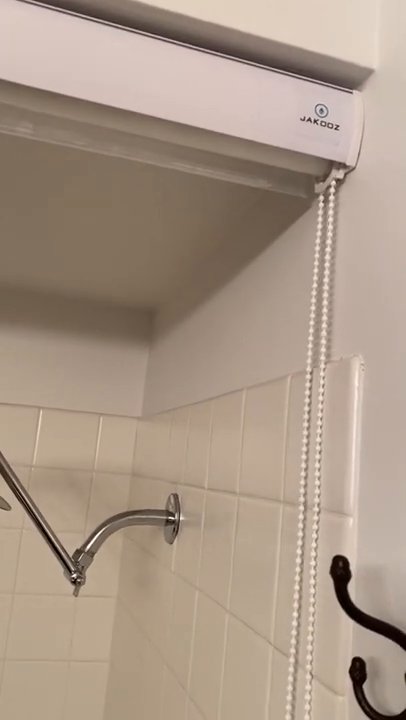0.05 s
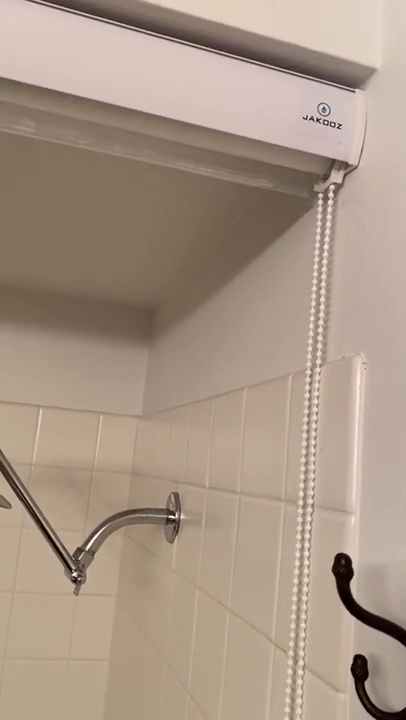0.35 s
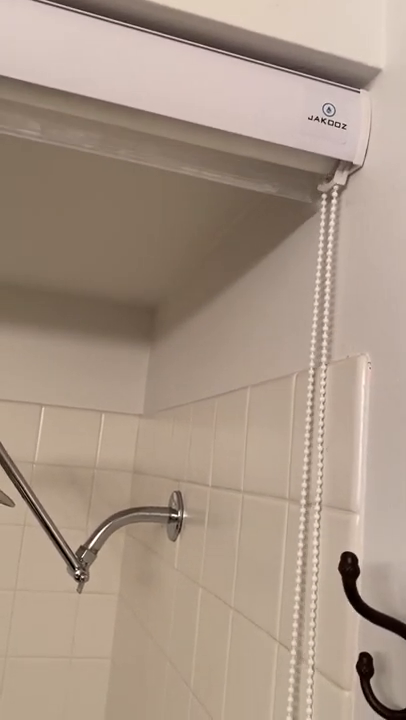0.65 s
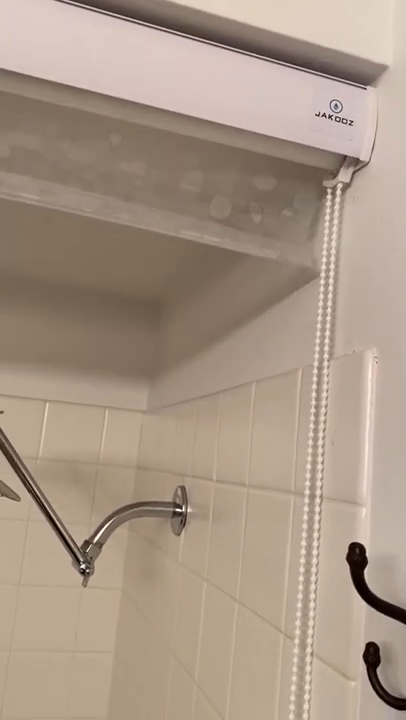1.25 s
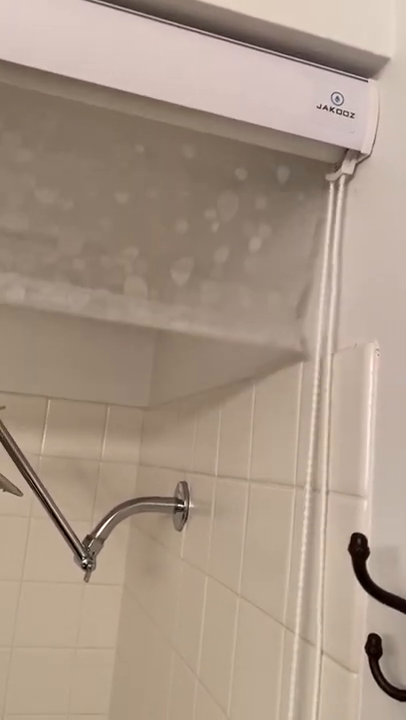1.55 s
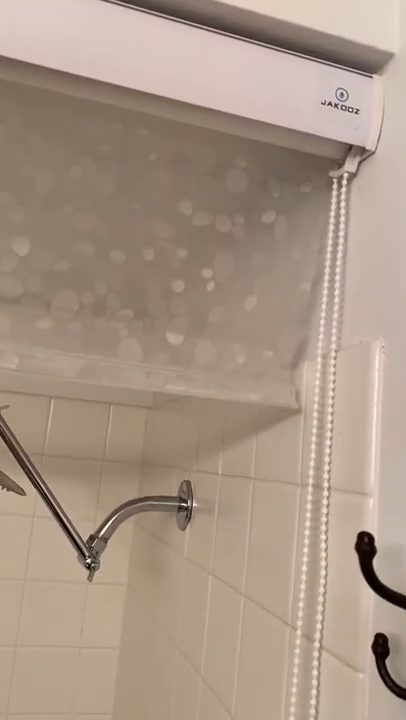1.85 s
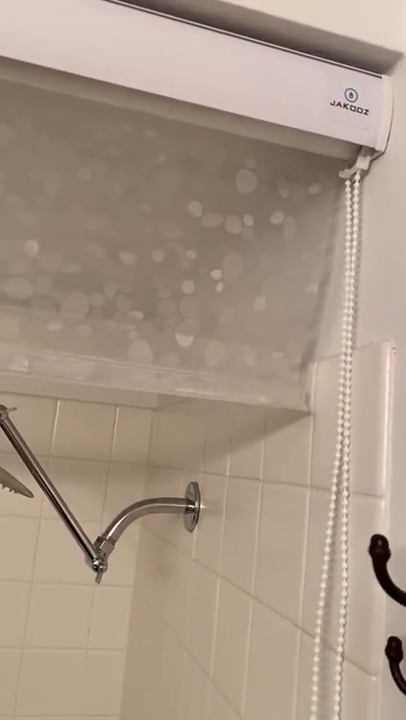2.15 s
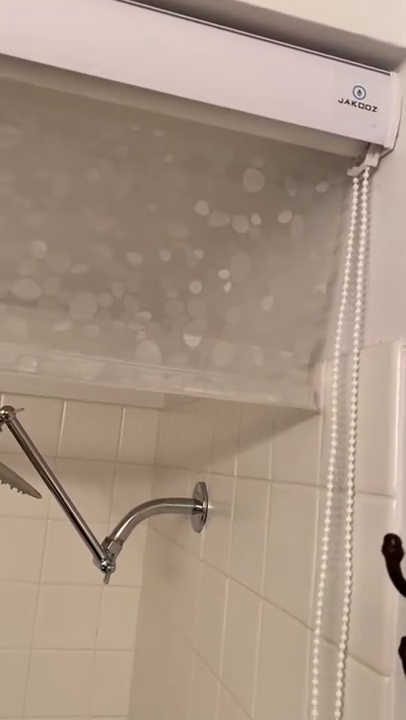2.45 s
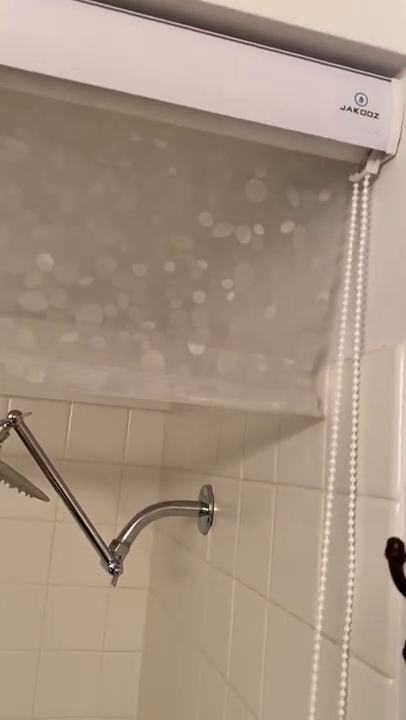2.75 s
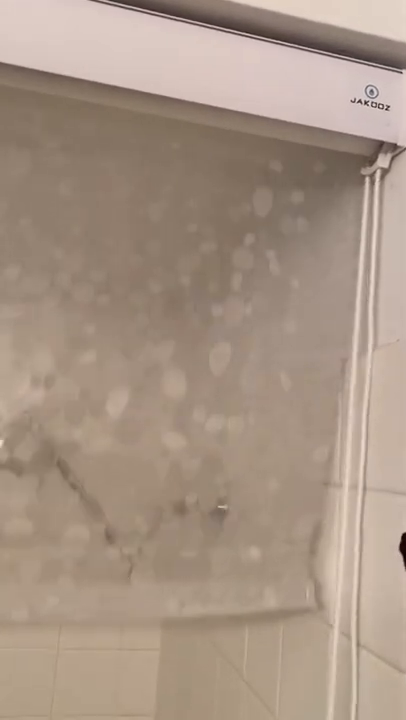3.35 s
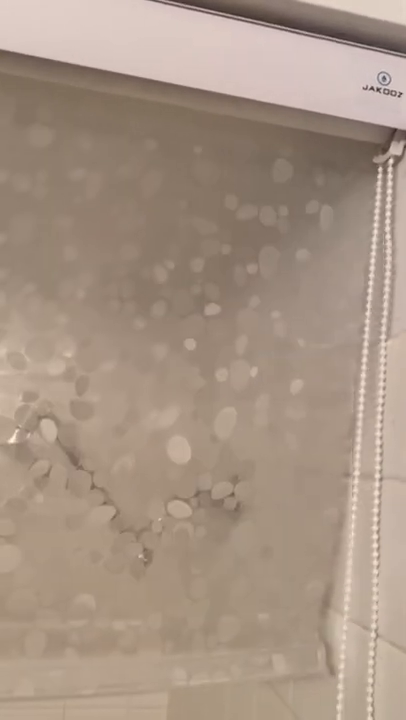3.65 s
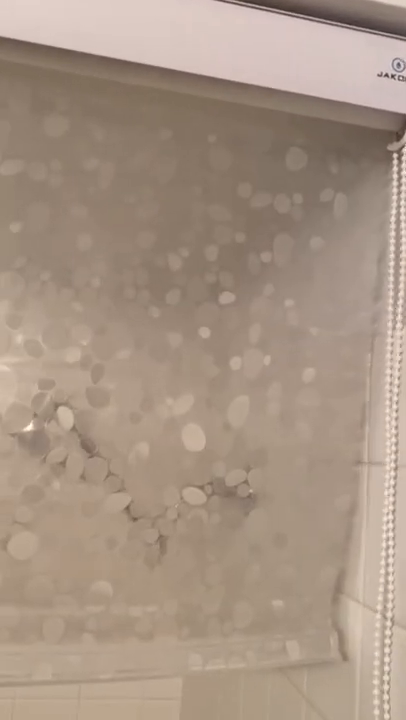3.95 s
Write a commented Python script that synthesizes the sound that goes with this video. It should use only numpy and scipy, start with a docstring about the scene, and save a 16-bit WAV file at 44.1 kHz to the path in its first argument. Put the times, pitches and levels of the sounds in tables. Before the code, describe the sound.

Bead chain clicks and whirs twice as a roller blind unrolls in a tiled bathroom.

```python
"""Roller blind in a tiled bathroom

Two pulls on a bead chain lower the blind: beads tick over the sprocket while clutch and tube whir.
Before each pull the slack chain swishes and knocks on the plastic housing; the first pull ends in a
clack and a thump. The tiles ring after every sound, over a low ventilation rumble."""
import sys
import numpy as np
from scipy import signal
from scipy.fft import rfft, irfft
from scipy.io import wavfile
from scipy.ndimage import uniform_filter1d

SR = 44100
rng = np.random.default_rng(int(sys.argv[2]) if len(sys.argv) > 2 else 0)


def log_audio(samples):
    """Write samples as a 16-bit WAV file to the path given in sys.argv[1]."""
    # one column per channel
    frames = np.atleast_2d(samples).T
    # limit to full scale, then quantise
    limited = np.clip(frames, -1, 1)
    pcm = np.round(limited * 32767).astype(np.int16)
    wavfile.write(sys.argv[1], SR, pcm)


N = 176400
T = np.arange(N) / SR
FILTER_HZ = np.fft.rfftfreq(8192, 1 / SR)


def amp(db):
    """Decibels to gain."""
    return 10 ** (np.asarray(db) / 20)


def unit(x):
    """Scales to rms 1."""
    return x / np.sqrt(np.mean(x ** 2) + 1e-20)


def curve(points, hz=FILTER_HZ):
    """Reads a table on a log-frequency axis."""
    f, value = np.transpose(points)
    return np.interp(np.log(hz + 1), np.log(f + 1), value)


def bins(size):
    """Frequencies of a spectrum."""
    return np.fft.rfftfreq(size, 1 / SR)


def add(mix, start_s, sound):
    """Drops a sound into the mix."""
    part = mix[max(round(start_s * SR), 0):][:len(sound)]
    part += sound[:len(part)]


def ring(db):
    """Minimum-phase impulse response of an EQ curve."""
    log_gain = np.log(amp(np.r_[db, db[-2:0:-1]]))
    return np.fft.ifft(np.exp(np.conj(signal.hilbert(log_gain)))).real[:len(db)]


def grains(per_s, spread_db):
    """Tiny random impacts of uneven size, rms 1."""
    size = amp(spread_db * np.minimum(rng.exponential(1, N), 3))
    return unit(size * rng.choice([-1, 1], N) * (rng.random(N) < per_s / SR))


def drift(smooth_s):
    """Slow random modulation, rms 1."""
    return unit(irfft(rfft(rng.standard_normal(N)) * np.exp(-(bins(N) * smooth_s) ** 2), N))


# how alike left and right are: f/Hz, coherence/0-1
COHERENCE = [(60,1),(200,.93),(380,.75),(600,.4),(3300,.35),(4300,.5),(5500,.75),(6500,.78),(7400,.97),(8800,.75),(10400,.95),(12200,.6),(13500,.96),(15000,.7)]
def stereo(a, b, hz):
    """Two unrelated spectra become a partly alike left and right."""
    same = np.clip(curve(COHERENCE, hz), 0, 1)
    return np.array([a, same * a + np.sqrt(1 - same ** 2) * b])


# rumble of moving air: f/Hz, gain/dB
AIR_EQ = [(20,-24.5),(35,-16),(52,-1.5),(95,-4),(122,-10),(155,-8),(195,-20),(240,-13),(350,-15.5),(500,-19.5),(750,-24.5),(1400,-36),(3000,-48),(7000,-57),(16000,-65.5)]
# ventilation hums: f/Hz, level/dB
HUMS = [(55,-63),(82,-61),(156,-68.5),(348,-73)]
def ventilation(air_db=-55.5, waver_hz=4.97):
    """The bed: a steady low rumble of air with a few wavering hums."""
    hz = bins(N)
    white = stereo(*rfft(rng.standard_normal((2, N))), hz)
    air = unit(irfft(white * amp(curve(AIR_EQ, hz)), N))
    hum = 0
    for f, db in HUMS:
        pitch = f + waver_hz * drift(smooth_s=.0664)
        hum += amp(db) * unit(np.sin(2 * np.pi * np.cumsum(pitch) / SR))
    return amp(air_db) * air + hum


# resonances of tube and housing: f/Hz, width/Hz, lift/dB
BODY_MODES = [(548,37,6.5),(811,31,5.5),(1052,36,4),(1180,40,7.5),(1289,20,6.5),(1880,300,2),(3220,150,-1),(4700,63,-0.5)]
def body(eq):
    """An EQ curve in dB with the mechanism's resonances on top."""
    return curve(eq) + sum(lift / (1 + (2 * (FILTER_HZ - f) / width) ** 2)
                           for f, width, lift in BODY_MODES)


def excite(impacts, eq):
    """Plays impacts through the mechanism."""
    return signal.oaconvolve(impacts, ring(body(eq)))[:N]


# slack chain sliding on itself: t/s, hold/s, level/dB
SWISH_CUES = [(0,0.0074,-52),(0.104,0.066,-62.5),(0.149,0.087,-59.5),(0.446,0.037,-68),(0.581,0.032,-63),(2.222,0.046,-60.5)]
# soft brush of the strands: f/Hz, gain/dB
SWISH_EQ = [(100,-2),(900,-3.5),(2300,2),(5500,-1.5),(8000,-12),(10000,-10.5),(12500,-17),(16000,-26)]
def swishes(attack_s=.0018, release_s=.0071):
    """The loose strands brush each other as the hand takes hold."""
    envelope = np.zeros(N)
    for start, hold, db in SWISH_CUES:
        attack = np.clip((T - start) / attack_s, 0, 1)
        release = np.exp(-np.maximum(T - start - hold, 0) / release_s)
        envelope += amp(db) * attack * release
    return excite(envelope * grains(per_s=4000, spread_db=.5), SWISH_EQ)


# hits on the housing, plus short bursts of chain rasp at 1.586, 1.598 and 3.1 s: t/s, level/dB, pitch/Hz,
# chatter decay/s, lift at the pitch/dB
KNOCK_CUES = [(.115,-27.5,1890,.012,-3),(.155,-25,2880,0.029,-5),(.183,-23,1490,0.0054,-4),(.193,-25.5,1960,0.0064,-2),(.197,-22,944,0.003,11),(.222,-41,1020,0.0034,10),
              (.604,-31,3880,0.0056,10),(.608,-29,2900,0.0047,-8),(.627,-26.5,1840,0.0028,6),(.63,-28,620,.0055,-5),(.71,-33.5,1520,0.047,6.5),(.886,-29.5,3660,0.0068,7),(1.006,-22.5,3960,0.0061,6),
              (1.586,-16,5800,0.01,18),(1.598,-17,3620,0.0056,10),
              (2.64,-31,1890,0.033,5),(2.668,-21.5,444,.006,8),(2.775,-26,1900,0.019,5),(2.797,-22,1890,0.0055,8.5),(3.0115,-10.5,1800,.003,11),(3.013,-19,3320,0.0078,12),
              (3.1,-16.5,3700,0.011,19),(3.134,-17,5730,0.0037,11),(3.228,-14.5,1150,0.0038,8),(3.497,-19.5,1170,0.0022,7.5),(3.5,-29,1980,0.0031,3),(3.525,-22,5840,0.0022,21)]
# tone of the plastic housing: f/Hz, gain/dB
HOUSING_EQ = [(30,-9),(100,11.5),(1000,1.5),(2400,2),(5500,-7),(7400,-10.5),(9000,-7),(10600,-11),(12400,-11),(15300,-12),(16000,-30)]
def knocks(rise_s=.0028, width_oct=.22, fall_db_per_oct=6.5):
    """Chain and clutch hit the housing, and the chain rasps in a few brief bursts: each a blow and a brief
    chatter, voiced round one pitch."""
    out, t = np.zeros(N), T[:4096]
    chatter, housing = grains(per_s=2500, spread_db=7.5), body(HOUSING_EQ)
    for k, (start, db, pitch, chatter_s, lift_db) in enumerate(KNOCK_CUES):
        envelope = np.exp(-t / chatter_s) * (1 - np.exp(-t / rise_s))
        blow = np.roll(chatter, k * len(t))[:len(t)] * envelope
        blow[0] += 2.9  # first contact
        octaves = abs(np.log2((FILTER_HZ + 10) / pitch))
        voicing = lift_db / (1 + (2 * octaves / width_oct) ** 2) - fall_db_per_oct * octaves
        knock = signal.fftconvolve(blow, ring(housing + voicing))
        add(out, start, amp(db) * knock / np.linalg.norm(knock))
    return out


# beads landing in the sprocket: t/s, relative level/dB
BEAD_CUES = [(0.1587, -53), (0.2268, -56), (0.8858, -65), (0.9279, -57), (1.0045, -59), (1.0166, -46),
             (1.0669, -50), (1.1113, -45), (1.191, -43.5), (1.2077, -49), (1.28, -54), (1.2905, -47),
             (1.3255, -54), (1.3404, -53), (1.4152, -44), (1.4431, -39), (1.4659, -39), (1.4959, -37),
             (1.629, -42), (1.7158, -40), (1.7404, -43), (1.7689, -50), (1.7993, -41), (2.6454, -53.5),
             (2.7721, -55), (2.8065, -59), (2.8285, -48.5), (2.8699, -56), (2.8848, -46), (2.9018, -46),
             (2.9188, -45.5), (2.9517, -45), (2.9806, -40.5), (3.0046, -38), (3.0275, -41.5), (3.054, -41),
             (3.0974, -40), (3.1164, -38.5), (3.1348, -38), (3.2036, -40), (3.2261, -34.5), (3.245, -39),
             (3.2574, -40), (3.2799, -40.5), (3.2969, -43), (3.3164, -36), (3.3324, -44), (3.3613, -51),
             (3.3774, -42), (3.3952, -43), (3.4161, -37.5), (3.4431, -37), (3.4531, -42), (3.4765, -46),
             (3.49, -35.5), (3.5159, -42), (3.5254, -45), (3.5648, -43), (3.5877, -49)]
# tick of a bead: f/Hz, gain/dB
BEAD_EQ = [(100,2.9),(600,18.7),(2000,8.9),(3300,6.3),(5400,9.9),(7400,6.6),(9000,11.2),(10400,17.2),(11300,5.8),(12400,7),(14000,4.8),(15200,4.8),(16000,7.6)]
# sharp edge of a hard landing: f/Hz, gain/dB
CRACK_EQ = [(200,-14.5),(1500,1),(4000,5.5),(5600,9.5),(6500,8.5),(7600,-4),(10000,2),(12400,1),(13800,1),(15000,3),(16000,5)]
def beads(seat_s=.0006, tap_gain_db=1.5, hard_db=-35, crack_db=-25, crack_growth=2.2):
    """Each bead snaps into its pocket and chatters as it seats; harder landings crack more."""
    taps, cracks, t = np.zeros(N), np.zeros(N), T[:160]
    for start, db in BEAD_CUES:
        tap = rng.choice([-1, 1], len(t)) * np.exp(-t / seat_s)
        add(taps, start, amp(db + tap_gain_db) * tap / np.linalg.norm(tap))
        add(cracks, start + seat_s, amp([crack_db + crack_growth * min(db - hard_db, 0)]))
    return excite(taps, BEAD_EQ) + excite(cracks, CRACK_EQ)


# fader moves, one list per pull: t/s, tube whir/dB, bead rasp/dB, treble/dB, clutch rattle/dB
PULL_FADERS = [
    [(.89,-54,-56,-76,-51.5),(1.0,-56,-66.5,-74,-57),(1.02,-54,-63.5,-70,-58),(1.25,-53.5,-62,-70.5,-60),(1.4,-48,-58,-66.5,-58.5),(1.512,-48.5,-53,-60.5,-47),(1.592,-54,-45,-58,-47),(1.66,-49,-50.5,-61,-47.5),(1.76,-48.5,-52.5,-61,-69),(1.81,-52.5,-59,-62.5,-72)],
    [(2.8,-53.5,-63,-78,-52),(2.87,-53.5,-61.5,-73,-70),(2.95,-46.5,-57,-64,-57),(3.005,-48.5,-54.5,-62,-42.5),(3.06,-49.5,-50,-58.5,-55),(3.128,-47,-49.5,-57,-43),(3.25,-51.5,-51,-57,-51),(3.366,-46,-56,-57.5,-54),(3.516,-47.5,-51.5,-58,-46.5),(3.63,-51,-55,-70.5,-56)],
]
WHIR, RASP, TREBLE, CLUTCH = 1, 2, 3, 4
def fader(column, pulls=PULL_FADERS, attack_s=.0074, release_s=.02):
    """One fader of the pulls as gain, dying quickly when the hand stops."""
    gain = np.zeros(N)
    for pull in map(np.array, pulls):
        times = pull[:, 0]
        before, after = np.maximum(times[0] - T, 0), np.maximum(T - times[-1], 0)
        gate = np.exp(-before / attack_s - after / release_s)
        gain += amp(np.interp(T, times, pull[:, column])) * gate
    return gain


# midrange whir of the tube: f/Hz, gain/dB
WHIR_EQ = [(60,3.5),(180,-2),(270,9),(700,9.5),(1200,8.5),(2050,9),(2700,5),(3500,-13.5),(6000,-24),(16000,-57)]
# bright rasp of the beads: f/Hz, gain/dB
RASP_EQ = [(200,-35),(1800,-1),(3000,6),(4200,10),(5400,8.5),(6200,2),(7300,-10),(9000,-22),(16000,-59)]
# rattle of the clutch: f/Hz, gain/dB
CLUTCH_EQ = [(200,-32),(900,-21),(1500,10.5),(1800,7),(2100,8.5),(2500,11),(2900,10),(4000,-21),(16000,-57)]
# fizz of the running chain: f/Hz, gain/dB
FIZZ_EQ = [(200,-51),(5000,-11),(7400,2),(9000,15),(10400,9),(11200,7),(12400,4),(14000,9),(15100,-12),(16000,-17)]
# top-end sizzle of a fast chain: f/Hz, gain/dB
SIZZLE_EQ = [(200,-45),(11000,-19),(13500,-7),(15100,11),(16000,5)]
def roller(beads_per_s=62, jitter=.35, full_speed_db=-57, db_per_doubling=11, throb=.5, jolt_s=.0032):
    """Tube and clutch rub; each passing bead jolts them and ticks. Gives both ends of the rail."""
    drive = fader(TREBLE) / amp(full_speed_db)  # the treble fader also sets the chain's speed
    rate = beads_per_s * 2 ** (20 * np.log10(drive + 1e-9) / db_per_doubling)
    wobble = unit(uniform_filter1d(rng.standard_normal(N), size=500))
    beads_passed = np.floor(np.cumsum(rate * np.exp(jitter * wobble)) / SR)
    passes = np.diff(beads_passed, prepend=0)
    jolts = signal.lfilter([1], [1, -np.exp(-1 / (jolt_s * SR))], passes)
    pulse = 1 - throb + 3 * throb * jolts

    def rub(gain, eq, per_s, spread_db):
        """Friction grains that throb with the beads."""
        return excite(grains(per_s, spread_db) * gain * pulse, eq)

    whir = np.array([rub(fader(WHIR), WHIR_EQ, per_s=1500, spread_db=3) for end in range(2)])
    rasp = np.array([rub(fader(RASP), RASP_EQ, per_s=1000, spread_db=-.5) for end in range(2)])
    near, far = (whir + rasp) / np.sqrt(2)
    clutch = rub(fader(CLUTCH), CLUTCH_EQ, per_s=570, spread_db=3)
    fizz = rub(fader(TREBLE), FIZZ_EQ, per_s=2500, spread_db=3)
    ticks = excite(passes * drive * amp(rng.normal(-48, 3.5, N)), BEAD_EQ)
    sizzle_gain = amp(full_speed_db) * drive ** 1.6  # swells faster than the fizz
    sizzle = rub(sizzle_gain, SIZZLE_EQ, per_s=1200, spread_db=7)
    return near + fizz + sizzle + ticks, far + clutch


# low end of the hollow tube: f/Hz, gain/dB
DRONE_EQ = [(30,-33),(70,-19),(92,14),(125,0),(180,-3),(400,-38),(16000,-86.5)]
def tube_drone(gain_db=-5.5, swell_db_per_s=2.8):
    """The turning tube rumbles in its brackets, louder as more of the blind hangs free."""
    envelope = fader(WHIR) * amp(gain_db + swell_db_per_s * T)
    friction = grains(per_s=1500, spread_db=2) * envelope
    return signal.oaconvolve(friction, ring(curve(DRONE_EQ)))[:N]


# tube and bracket modes, shifting as the blind unrolls, one list per pull: f/Hz, half-width/Hz, gain/dB
RING_MODES = [
    [(1064,54,13),(1930,175,12.5),(2480,140,6.5),(3710,240,1)],
    [(815,37,7.5),(1164,52,17),(1914,174,11.5),(3320,41,2),(3785,68,1)],
]
def tube_ring(gain_db=11, flutter_db=3.5):
    """Small jolts set the tube ringing in uneven spurts once the chain runs fast."""
    out = np.zeros(N)
    flutter = amp(flutter_db * np.clip(drift(smooth_s=.04), -2, 1))
    for pull, modes in zip(PULL_FADERS, RING_MODES):
        jolts = grains(per_s=400, spread_db=3.5) * fader(TREBLE, pulls=[pull]) * flutter
        peaks = sum(amp(db) / (1 + ((FILTER_HZ - f) / half_width) ** 2) for f, half_width, db in modes)
        out += signal.oaconvolve(jolts, ring(20 * np.log10(peaks + 1e-4)))[:N]
    return amp(gain_db) * out


# the clutch catching and rebounding: t/s, clack level/dB, snap level/dB, chatter decay/s
CLACK_CUES = [(1.8664,-9,-20,0.0063),(1.879,-25,-26,0.0091),(1.886,-17.5,-34,0.0044)]
# plastic body of the clack: f/Hz, gain/dB
CLACK_EQ = [(200,-11.5),(1300,-6.5),(1850,-3.5),(2300,1.5),(2520,-3),(2650,-5),(3250,-4),(3750,-3.5),(4300,-6.5),(5300,-8.5),(6200,-4.5),(8000,-26.5),(16000,-41)]
# bright snap on top: f/Hz, gain/dB
SNAP_EQ = [(200,-33),(4000,-6),(6300,6.5),(7500,0),(9300,-10),(10800,-1),(11800,-13),(13000,-21),(16000,-20)]
def clutch_clack():
    """The clutch stops the tube: a plastic clack with a bright snap, then two rebounds."""
    out, t = np.zeros(N), T[:4096]
    for start, clack_db, snap_db, chatter_s in CLACK_CUES:
        blow = rng.choice([-1, 1], len(t)) * np.exp(-t / chatter_s)
        for eq, db in (CLACK_EQ, clack_db), (SNAP_EQ, snap_db):
            layer = signal.fftconvolve(blow, ring(curve(eq)))
            add(out, start, amp(db) * layer / np.linalg.norm(layer))
    return out


# dull weight of the frame: f/Hz, gain/dB
THUMP_EQ = [(20,-12),(45,7),(70,5),(115,1),(160,4),(210,-8),(310,-3),(420,-8.5),(900,-26),(16000,-99)]
def frame_thump(start_s=1.872, gain_db=1):
    """The blind jerks to a halt and gives its frame one dull push."""
    out = np.zeros(N)
    add(out, start_s, amp(gain_db) * ring(curve(THUMP_EQ)))
    return out


# decay of the tiled room: f/Hz, t60/s
TILE_DECAY = [(100,0.48),(250,0.28),(700,0.47),(1700,0.47),(4500,0.39),(9000,0.3),(16000,0.28)]
# tone of the reverb tail: f/Hz, gain/dB
TAIL_EQ = [(100,4),(2000,0),(5000,0.5),(9000,-6.5),(16000,-6.5)]
# slaps off the nearest walls: t/s, gain/linear
WALL_ECHOES = [(.0019,0.087),(.0044,0.078),(.0078,.17),(0.0092,0.092)]
# tone of the direct sound and the slaps: f/Hz, gain/dB
NEAR_EQ = [(100,-9),(2000,-13),(5000,-1.5),(9000,2.5),(16000,-5)]
def bathroom(x, wet_db, near_db, build_s=.0008):
    """Direct sound, the nearest walls, then the dense ring of the tiles."""
    bands, t, noise = signal.stft(rng.standard_normal((2, SR)), SR, nperseg=256)
    t60 = curve(TILE_DECAY, bands)[:, None]
    equal_energy = np.sqrt(np.log(1e6) / (t60 * SR))
    tail = signal.istft(noise * amp(-60 * t / t60) * equal_energy, SR, nperseg=256)[1][:, :SR]
    tail *= 1 - np.exp(-T[:SR] / build_s)
    hz = bins(SR)
    wet = stereo(*rfft(tail), hz) * amp(curve(TAIL_EQ, hz) + wet_db)
    echoes = sum(gain * np.exp(-2j * np.pi * hz * delay) for delay, gain in WALL_ECHOES)
    near = (1 + echoes) * amp(curve(NEAR_EQ, hz) + near_db)
    response = irfft(wet + near)[:, :SR * 3 // 4]
    return signal.fftconvolve(x[None], response, axes=1)[:, :N]


def scene():
    """Rail, chain and frame take their own paths through the room, over the ventilation bed."""
    rail = sum(bathroom(end, wet_db=-.5, near_db=-1.5) for end in roller())
    rail += bathroom(tube_ring(), wet_db=-2, near_db=1.5)
    chain = bathroom(beads(), wet_db=0, near_db=3)
    chain += bathroom(swishes(), wet_db=1.1, near_db=2)
    frame = bathroom(knocks() + clutch_clack(), wet_db=-1, near_db=-.5)
    frame += bathroom(frame_thump() + tube_drone(), wet_db=.5, near_db=-7.5)
    return rail + chain + frame + ventilation()


# phase between the microphone ports: f/Hz, left lead/rad
PORT_PHASE = [(20,0),(300,.05),(900,.5),(1800,.1),(2800,1.8),(4000,.9),(5300,.8),(6300,1.95),(7100,2.95),(7750,3.3),(9000,4.9),(10400,6.28),(11800,7.5),(13000,9.1),(14000,9.7),(16000,12.1)]
# balance of the ports: f/Hz, left minus right/dB
PORT_BALANCE = [(60,-0.3),(250,-1),(380,0.5),(600,3),(1290,2.7),(2380,0.6),(4400,0),(16000,0)]
def record(dry, cutoff_hz=15950):
    """Two microphone ports a little apart, then a steep low-pass."""
    hz = bins(2 * N)
    left = amp(curve(PORT_BALANCE, hz) / 2) * np.exp(.5j * curve(PORT_PHASE, hz))
    ports = irfft(rfft(dry, 2 * N) * np.array([left, 1 / left]))[:, :N]
    lowpass = signal.firwin(511, cutoff_hz, window=("kaiser", 9), fs=SR)
    return signal.oaconvolve(ports, lowpass[None], "same")


dry = scene()
out = record(dry)
log_audio(out)
```